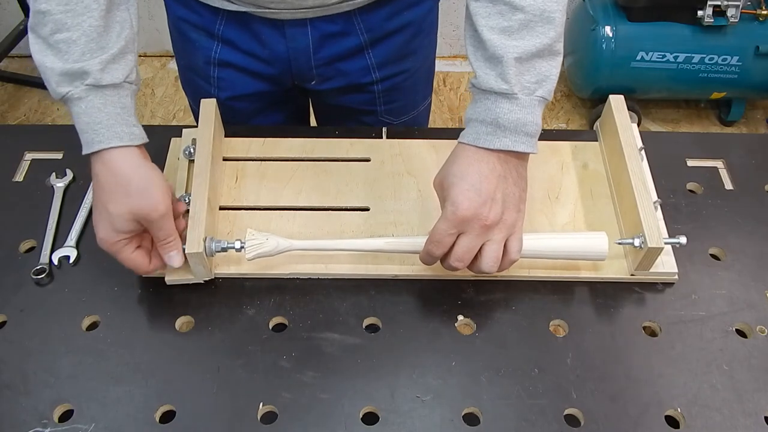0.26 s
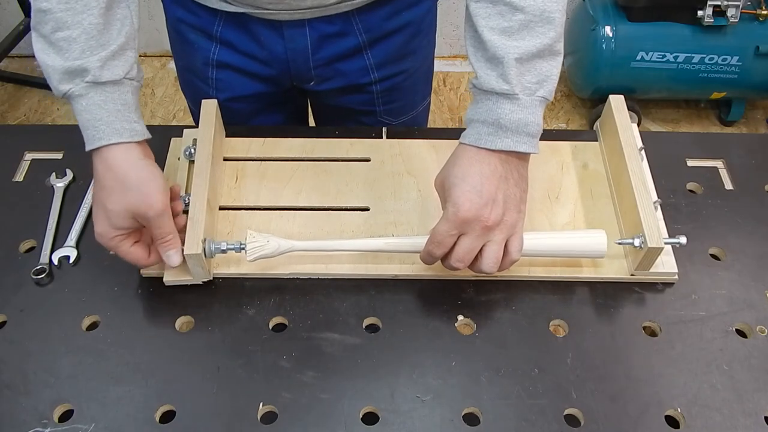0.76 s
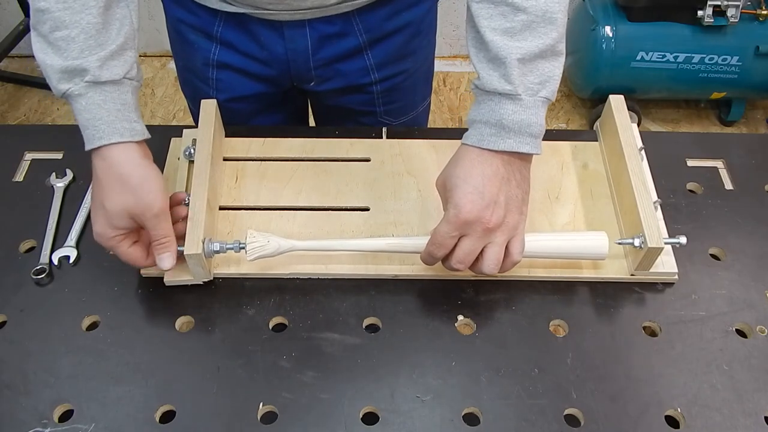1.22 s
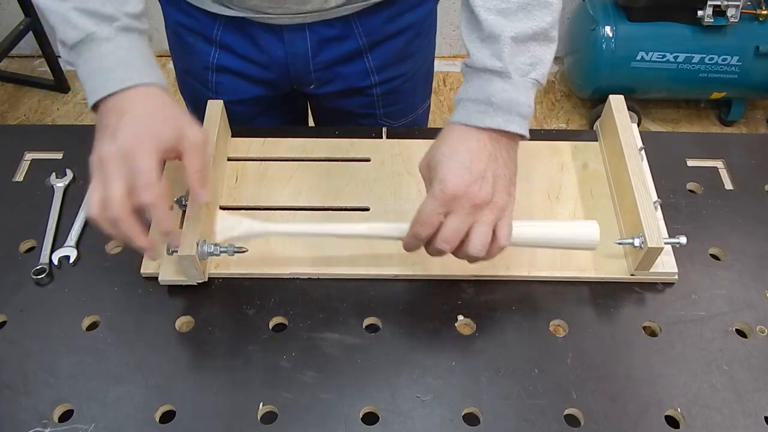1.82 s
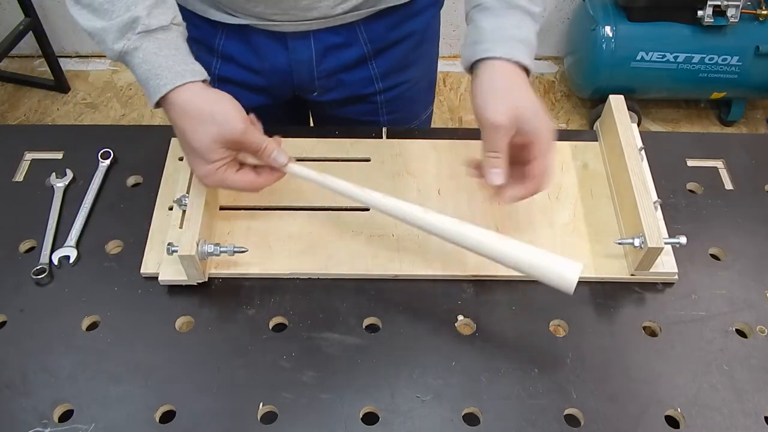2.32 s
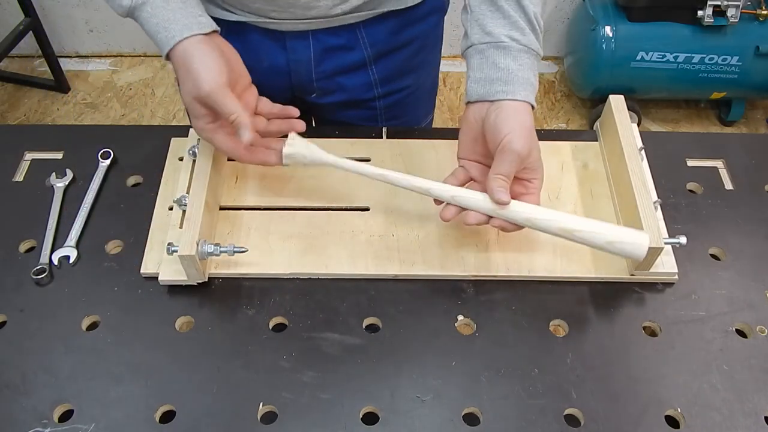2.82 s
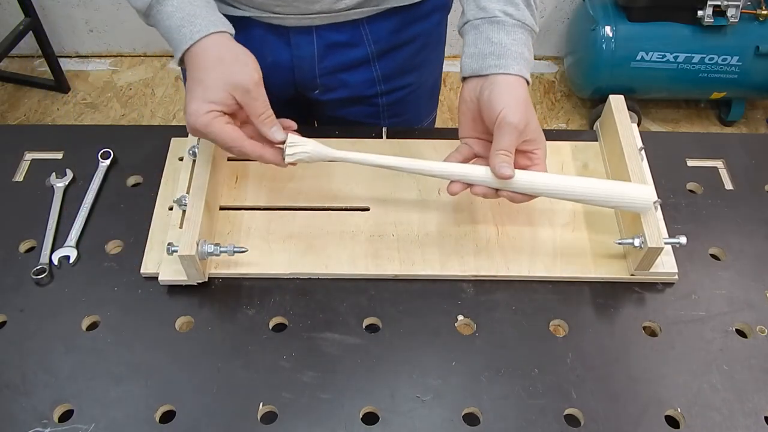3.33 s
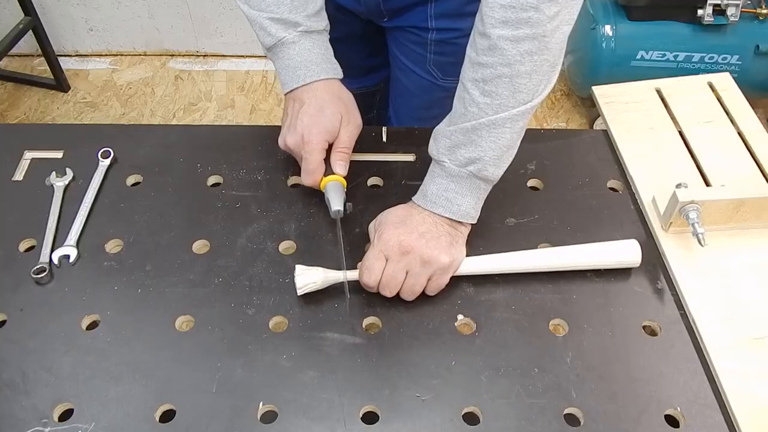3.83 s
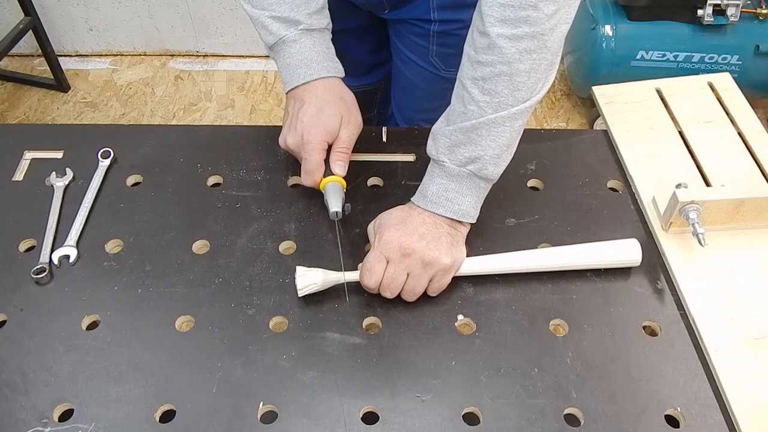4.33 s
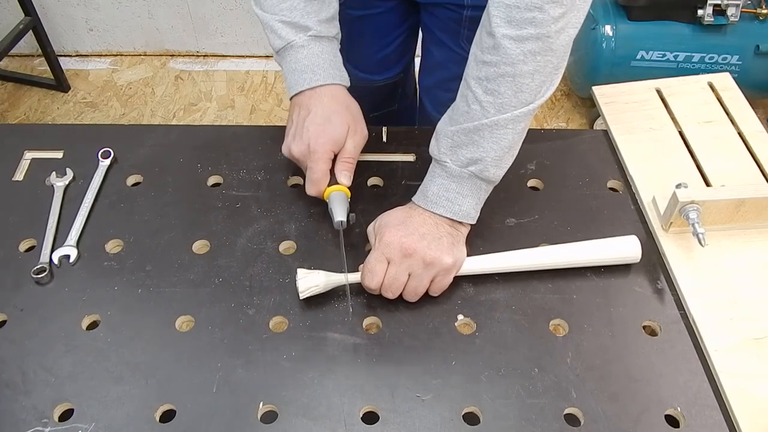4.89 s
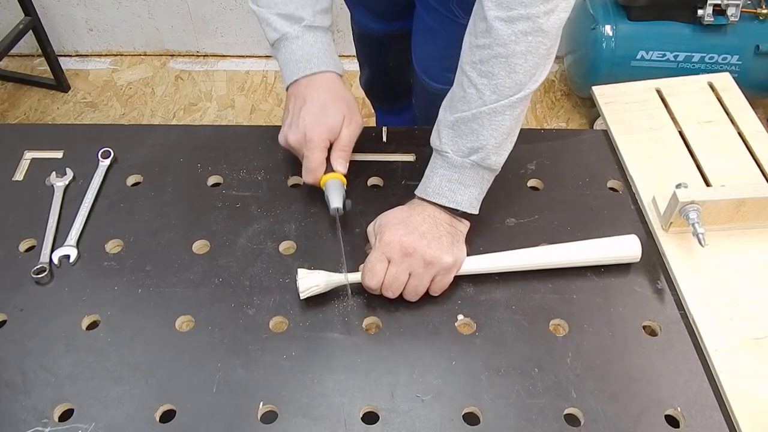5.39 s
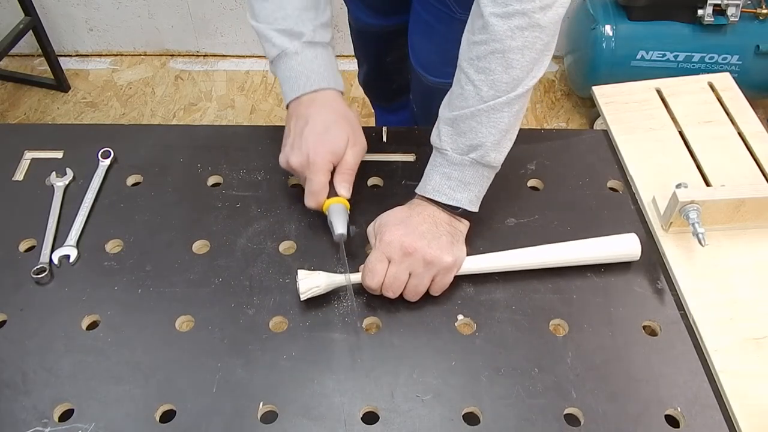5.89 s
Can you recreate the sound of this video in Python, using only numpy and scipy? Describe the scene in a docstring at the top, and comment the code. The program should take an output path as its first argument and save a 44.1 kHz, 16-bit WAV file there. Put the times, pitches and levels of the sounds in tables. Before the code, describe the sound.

Light metallic clicks and uneven scraping come from a screw being loosened in a wooden jig. After a knock, a lull holds only faint rubbing of skin on wood and a soft thud. A small hand saw then catches and rasps through a stick, its strokes growing stronger and more regular, with a hollow boom from the workbench and brief rings from the blade. It is heard from nearby in a quiet, slightly reverberant workshop.

```python
"""A fine hand saw cuts a turned stick on a hollow bench: its teeth catch and tear, rasping in the wood
and hissing in the blade, while the judder drives the bench's resonances to a boom. Before the cut,
fingers back a steel screw out of a plywood jig by stick-slip, with clicks and soft knocks, then lift
the stick and stroke it. Steel rings on faintly now and then. A quiet room rumble lies under everything."""
import sys
import numpy as np
from scipy import signal
from scipy.fft import rfft, irfft, next_fast_len
from scipy.io import wavfile

SR = 44100
rng = np.random.default_rng(int(sys.argv[2]) if len(sys.argv) > 2 else 0)


def file_out(sig):
    """Save sig as 16-bit WAV at sys.argv[1]."""
    # one column per channel
    cols = np.atleast_2d(sig).T
    # limit, then scale
    lim = np.clip(cols, -1, 1)
    pcm = np.round(lim * 32767).astype(np.int16)
    wavfile.write(sys.argv[1], SR, pcm)


N = 271215
FFT_SIZE = next_fast_len(N + SR // 2)
HZ = np.arange(FFT_SIZE // 2 + 1) * SR / FFT_SIZE

# Saw strokes. Each row: start, crest and stop in seconds, starting level relative to the crest in dB,
# then the levels in dB of bench shake, top panel, stick, tooth rasp and blade hiss.
SAW_STROKES = [(3.578, 3.667, 3.69, -7, -61, -67, -68, -75, -72),
               (3.703, 3.771, 3.785, -1.5, -41, -51, -45, -51, -52),
               (3.821, 3.828, 3.82, -10, -60, -57, -50.5, -75, -78),
               (3.961, 4.03, 4.05, -7.5, -32, -63, -45, -49, -52),
               (4.245, 4.33, 4.345, -16, -49.5, -57, -56, -60.5, -59),
               (4.364, 4.46, 4.55, -10.5, -32, -37.5, -41.5, -44.5, -51),
               (4.546, 4.654, 4.655, -2.5, -55, -47, -54, -41, -49.5),
               (4.656, 4.75, 4.756, -3.5, -26, -29.5, -32.5, -41.5, -44.5),
               (4.803, 4.838, 4.917, -5, -58, -48, -52.5, -54, -59),
               (5.007, 5.048, 5.11, -10, -28.5, -29.5, -41, -40, -44),
               (5.165, 5.251, 5.305, -14, -31, -32, -33.5, -40.5, -45.5),
               (5.361, 5.463, 5.49, -11.5, -31.5, -30.5, -36.5, -40.5, -47),
               (5.531, 5.62, 5.65, -15.5, -28, -29, -29, -37.5, -43.5),
               (5.693, 5.747, 5.815, -8.5, -31.5, -30, -36, -43.5, -53),
               (5.86, 5.925, 5.975, -14, -31, -27, -29.5, -37, -42.5),
               (6.03, 6.12, 6.17, -8.5, -29, -29.5, -35.5, -41, -49)]
# Resonances of the screw thread and of rubbed skin. Each row: frequency and bandwidth in Hz, level in dB.
THREAD_MODES = [(910, 180, -3), (1367, 130, 7.5), (1660, 220, 1), (2160, 300, -1.5), (2406, 31, 2),
                (2500, 230, -11.5), (2844, 130, -2), (3530, 420, -8), (4770, 890, -13.5),
                (5750, 1040, -16.5)]
SKIN_MODES = [(2140, 500, -5.5), (4000, 2700, -9), (8800, 2000, -4), (10440, 1560, -2.5), (11550, 870, -2),
              (12900, 1300, -6), (14800, 1800, -11)]


def saw():
    """Forced vibration: coarse catches of the teeth shake bench and stick, fine ones rasp and hiss."""
    # Resonances of each part. Each row: frequency and bandwidth in Hz, level in dB.
    bench_modes = [(133.6, 25, -3.5), (157, 38.6, 0), (172, 25.1, 2)]
    panel_modes = [(226, 17, 6), (296.4, 54, -5.5), (297.6, 18.6, -6.5), (343, 29, -13), (356.5, 23, -7),
                   (448, 27, -13.5)]
    frame_modes = [(37, 14, -7.5), (51, 46, -8), (104.9, 4.3, 8.5)]
    stick_modes = [(503, 29, -0.5), (594, 47, -1), (690, 54, -1), (719, 42, 6), (753, 61.3, 6.5),
                   (777.6, 58, 2.5), (837, 38, -3.5), (1053, 210, -13), (1208, 128, -9), (1310, 25, -1),
                   (1495, 48, -5)]
    tooth_modes = [(1250, 610, -6), (1706, 113, 1), (1950, 207, -0.5), (2366, 74, 0), (2610, 175, -3),
                   (3140, 1010, -6), (3850, 450, -3.5), (4600, 890, -9), (5620, 2200, -14.5),
                   (8400, 3100, -32.5)]
    hiss_modes = [(6500, 1950, -2.5), (8500, 1200, 0.5), (10820, 2470, 2), (11950, 530, 7.5),
                  (13050, 1200, -1.5), (15200, 1800, -4.5)]
    # Contours of a stroke, one row for each of its five layers, with columns as in envelopes().
    contours = [(.3, -4.5, -300, 0.85, 0.018, .015, 0.0071), (.4, -2, -300, 0.6, 0.0085, -.006, 0.028),
                (.9, -2.5, -200, 1.6, 0.01, .012, 0.016), (.9, -2, -200, 1.8, 0.0051, .004, 0.028),
                (.9, -3.5, -270, 1.8, 0.0029, 0.0033, 0.033)]
    # Weight leaned on the bench brings in its frame. Each row: time in seconds, dB over the shake.
    leaning = [(3.6, -21), (4.1, -5.5), (4.4, -2.5), (4.7, -7.5), (5.1, -10), (5.4, -7), (5.65, 1.5),
               (5.9, -4.5), (6.15, -5)]
    # Snags that jolt the bench, and bites of the first tooth. Each row: time in seconds, peak in dB.
    snags = [(3.756, -25.5), (3.963, -33), (4.446, -21), (4.476, -22), (4.701, -33), (5.393, -18),
             (5.462, -22), (5.741, -20.5)]
    bites = [(3.702, -45), (3.957, -53), (4.364, -43), (4.657, -29), (5.017, -54)]
    shake, top, stick, rasp, hiss = envelopes(SAW_STROKES, contours)
    bench, panel, shaft, teeth = map(body, (bench_modes, panel_modes, stick_modes, tooth_modes))
    weight = amp(np.interp(np.arange(N) / SR, *np.transpose(leaning), left=-200, right=-200))
    catches = slips(per_s=500, spread_db=3)
    fine_catches = hiss * slips(per_s=12000, spread_db=-1.5)
    boom = (filtered(shake * catches, bench) + filtered(top * catches, panel)
            + filtered(weight * shake * catches, body(frame_modes)))
    return (standing_damping() * boom
            + filtered(stick * slips(per_s=900, spread_db=2), shaft)
            + filtered(rasp * slips(per_s=4000, spread_db=1), teeth)
            + filtered(shifting_whistle(fine_catches), amp(-0.5) * body(hiss_modes))
            + strikes(*np.transpose(snags), panel + amp(-1.5) * bench)
            + strikes(*np.transpose(bites), shaft + teeth))


def shifting_whistle(hiss):
    """Narrow treble peaks, drawn at random every tenth of a second, give the hiss a faint whistle."""
    low_hz, high_hz, width_hz = 4000, 15500, 70
    out, hop = hiss.copy(), SR // 10
    r = np.exp(-np.pi * width_hz / SR)
    for i in range(round((SAW_STROKES[0][0] - .1) * SR), N, hop):
        piece = np.hanning(2 * hop)[:N - i] * hiss[:, i:i + 2 * hop]
        for hz in rng.uniform(low_hz, high_hz, size=11):
            poles = [1, -2 * r * np.cos(2 * np.pi * hz / SR), r * r]
            out[:, i:i + 2 * hop] += signal.lfilter([1 - r * r, 0, r * r - 1], poles, piece)
    return out


def standing_damping():
    """Contact damping: the gain of the ringing wood sinks while the blade stands between strokes."""
    damping_db_per_s, freed_early_s = -120, .012
    t, db = np.arange(N) / SR, 0
    for previous, following in zip(SAW_STROKES, SAW_STROKES[1:]):
        stop, freed = previous[2], following[0] - freed_early_s
        depth_db = damping_db_per_s * max(freed - stop, 0)
        db = db + np.interp(t, [stop, freed, freed + .002], [0, depth_db, 0])
    return amp(db)


def screw():
    """Stick-slip friction: the thread judders the jig and rasps in the steel, while skin hisses."""
    # Turns of the screw. Each row: start, crest and stop in seconds, starting level relative to
    # the crest in dB, then the levels in dB of shake, rasp and hiss.
    turns = [(-.02, .03, 0.052, -10, -40, -42.5, -53), (.2, .26, 0.62, -30, -53.5, -62, -69),
             (.294, .31, .44, 0, -40.5, -46, -58), (.55, .565, 0.61, -3, -48.5, -54, -66.5),
             (.785, .93, 1, -12.5, -40.5, -43, -60), (.996, 1.005, 1.03, -3, -37.5, -41, -68),
             (1.272, 1.285, 1.33, -6, -39.5, -45, -64), (1.33, 1.362, 1.438, -5, -38, -37.5, -55),
             (1.56, 1.58, 1.63, -9, -48.5, -52.5, -69)]
    # Contours of a turn, one row for each of its three layers, with columns as in envelopes().
    contours = [(.3, -2.5, -200, 1, 0.0073, 0.0086, 0.032), (.9, -8, -170, 1, .002, 0.0017, 0.023),
                (.9, -10.5, -110, 0.7, 0.0016, .002, 0.032)]
    # Resonances of the jig on the bench. Each row: frequency and bandwidth in Hz, level in dB.
    jig_modes = [(50.3, 77, -8.5), (95.4, 9.6, 4.5), (144.6, 25, 4), (164, 23.4, 7), (187.6, 49, -1),
                 (226.5, 43, -3.5), (276, 32, -7.5), (393, 27, -5.5), (467, 45, -13), (564, 20, -9),
                 (700, 46, -9), (865, 78, -15)]
    shake, rasp, hiss = envelopes(turns, contours)
    return (filtered(shake * slips(per_s=400, spread_db=2), body(jig_modes))
            + filtered(rasp * slips(per_s=1200, spread_db=-2), body(THREAD_MODES))
            + filtered(hiss * slips(per_s=6000, spread_db=1), body(SKIN_MODES)))


def screw_clicks():
    """Impulse excitation: each click sounds the thread's modes and rings briefly at its own pitch."""
    # Clicks of the screw in its seat. Each row: time in seconds, peak in dB, pitch in Hz.
    clicks = [(0.293, -39.5, 2450), (0.302, -58, 2350), (0.454, -39.5, 2070), (0.4732, -53, 2170),
              (0.5472, -37, 2050), (0.795, -40, 2040), (0.908, -28.5, 1330), (0.9333, -30, 1410),
              (0.99, -24.5, 2180), (1.2669, -36.5, 1940), (1.2735, -32.5, 2006), (1.351, -38, 2480),
              (1.366, -30, 2720), (1.567, -44.5, 1960)]
    times, peaks_db, _ = np.transpose(clicks)
    blunt_contact = 1 / (1 + 1j * HZ / 4000) ** 2
    out = strikes(times, peaks_db, body(THREAD_MODES) * blunt_contact)
    t, t60_s = np.arange(SR // 10) / SR, 0.028
    ring = amp(-3 - 60 * t / t60_s)
    for start, db, hz in clicks:
        i = round(start * SR)
        out[:, i:i + len(t)] += amp(db) * ring * np.sin(2 * np.pi * hz * t)
    return out


def jig_knocks():
    """Soft impact: a padded blow spreads its force over milliseconds, so it excites mainly low modes."""
    # Blows on the jig's end wall. Each row: time in seconds, peak in dB, contact cut-off in Hz.
    blows = [(.338, -38, 700), (.402, -35, 600), (1.448, -25, 1100), (1.4549, -25.5, 1100),
             (1.568, -38, 1200), (3.243, -28, 550), (3.2498, -21, 490)]
    # Resonances of that wall. Each row: frequency and bandwidth in Hz, level in dB.
    wall_modes = [(100.6, 11, -9), (138, 21, -0.5), (163, 14, 4), (190.6, 27, -7), (229.6, 19, 2),
                  (267, 22, 1), (358, 28, 0.5), (410, 23, -5), (464.5, 11, -2.5), (521, 30, -4)]
    wall = body(wall_modes)
    return sum(strikes([s], [db], wall / (1 + 1j * HZ / cut_hz) ** 4) for s, db, cut_hz in blows)


def singing_steel():
    """Free vibration: released thin steel keeps one fluttering partial until a contact damps it."""
    # Each row: start in seconds, frequency in Hz, level in dB, then T60 and duration in seconds.
    partials = [(1.404, 9308, -73, 2.3, 0.54), (1.45, 11500, -78, 2.0, .45), (1.50, 6471, -74, 1.2, .12),
                (3.772, 2342, -58, 1.3, 0.27), (4.065, 2342, -63, 1.1, 0.12),
                (5.253, 2325, -43, 1.54, 0.11), (5.738, 2064, -38, 0.93, 0.14)]
    flutter_db, flutter_per_s, attack_s = 3, 90, 0.009
    out = np.zeros((2, N))
    for start, hz, db, t60, duration in partials:
        t = np.arange(round(1.5 * duration * SR)) / SR
        flutter = np.interp(t, np.arange(200) / flutter_per_s, rng.standard_normal(200))
        ring = amp(db - 60 * t / t60 + flutter_db * flutter)
        gate = (1 - np.exp(-t / attack_s)) * np.exp(-(t / duration) ** 8)
        i = round(start * SR)
        out[:, i:i + len(t)] += ring * gate * np.sin(2 * np.pi * hz * t)
    return out


def fingers():
    """Sliding friction: dry skin on the smooth stick makes a bright hiss of tiny slips."""
    # Each row: start, crest and stop in seconds, starting level relative to the crest in dB, level in dB.
    slides = [(1.45, 1.65, 1.9, -15, -71.5), (2.0, 2.095, 2.115, -25, -56.5), (2.2, 2.33, 2.4, -13, -67),
              (2.47, 2.505, 2.56, -4, -59.5), (2.8, 2.845, 2.8, -20, -56), (3.06, 3.13, 3.15, -19, -67),
              (3.24, 3.28, 3.25, -20, -62)]
    contour = (.9, -5.5, -250, 0.77, 0.009, 0.0019, 0.026)   # columns as in envelopes()
    holding_db = -73   # steady hiss of hands at rest
    hiss = envelopes(slides, [contour])[0] + amp(holding_db)
    return filtered(hiss * slips(per_s=7000, spread_db=1.5), body(SKIN_MODES))


def reverberation(x):
    """Repeated reflection: ten feedback delays a channel, dulled by wall absorption on every round."""
    t60_s, wall_cutoff_hz = 0.44, 5600
    response = np.zeros((2, len(HZ)), complex)
    absorption = 1 / (1 + 1j * HZ / wall_cutoff_hz)
    for k, delay_s in enumerate(rng.uniform(.015, .045, 20)):
        loop = amp(-60 * delay_s / t60_s) * absorption * np.exp(-2j * np.pi * HZ * delay_s)
        response[k % 2] += (-1) ** (k // 2) * loop / (1 - loop)
    return filtered(x, response)


def room_tone():
    """Diffuse field: distant machinery and air give steady coloured noise, as mid and side."""
    # Each row: frequency in Hz, relative spectral density in dB.
    spectrum = [(12, -40), (20, 2.5), (58, -3.5), (76, 2.5), (153, -4.5), (214, -5.5), (253, -6),
                (275, -12.5), (344, -8), (523, -12.5), (569, -14.5), (1240, -15), (2640, -25.5),
                (3030, -26), (15700, -45)]
    # Stereo width. Each row: frequency in Hz, side relative to mid in dB.
    width = [(60, -9.5), (240, -5), (950, -3), (3770, 0), (15000, 0.5)]
    noise = filtered(rng.standard_normal((2, N)), amp(curve_db(spectrum)))
    mid, side = amp(-53.5) * noise / noise.std()
    return np.array([mid, filtered(side, amp(curve_db(width)))])


def envelopes(movements, contours):
    """Amplitude envelopes, one a layer: each hand movement swells, sags and dies; their powers add."""
    # Each contour row: share of the swell, sag in dB, decay in dB per second, exponent of swell and sag,
    # then advance of the crest, advance of the stop and attack time in seconds.
    t, out = np.arange(0, N + 32, 32) / SR, []
    for k, (share, sag_db, decay, power_law, crest_lead, stop_lead, attack) in enumerate(contours):
        power = 0
        for start, crest, stop, start_db, *levels_db in movements:
            crest, stop = max(crest - crest_lead, start + .001), stop - stop_lead
            swell = np.interp(t, [start, crest], [1, 0]) ** power_law
            sag = np.interp(t, [crest, stop], [0, 1]) ** power_law
            edges_db = np.interp(t, [start - attack, start, stop, stop + 1], [-40, 0, 0, decay], left=-200)
            power = power + amp(levels_db[k] + share * start_db * swell + sag_db * sag + edges_db) ** 2
        out.append(np.interp(np.arange(N) / SR, t, np.sqrt(power)))
    return out


def slips(per_s, spread_db):
    """Shot noise: independent mid and side trains of impulses of uneven size, at rms 1."""
    sizes = amp(spread_db * np.minimum(rng.exponential(1, (2, N)), 4))
    signs = rng.choice([-1, 1], (2, N))
    train = sizes * signs * (rng.random((2, N)) < per_s / SR)
    return train / train.std()


def strikes(times, peaks_db, response):
    """Impulse responses of a body, scaled to peak levels; the side channel takes random signs."""
    impulses = np.zeros((2, N))
    signs = [np.ones(len(peaks_db)), rng.choice([-1, 1], len(peaks_db))]
    impulses[:, np.round(np.asarray(times) * SR).astype(int)] = amp(peaks_db) * signs
    return filtered(impulses, response / np.abs(irfft(response, FFT_SIZE)).max())


def body(modes):
    """Modal superposition: resonances summed with alternating signs, at unit power gain for noise."""
    z, response = np.exp(-2j * np.pi * HZ / SR), 0
    for k, (hz, width_hz, db) in enumerate(modes):
        r = np.exp(-np.pi * width_hz / SR)
        poles = 1 - 2 * r * np.cos(2 * np.pi * hz / SR) * z + r * r * z * z
        response = response + (-1) ** k * amp(db) * (1 - r * r) * (1 - z * z) / poles
    return response / np.sqrt(np.mean(np.abs(response) ** 2))


def filtered(x, response):
    """Convolution as a product of spectra."""
    return irfft(rfft(x, FFT_SIZE) * response, FFT_SIZE)[..., :N]


def curve_db(points):
    """Levels interpolated over logarithmic frequency."""
    hz, db = np.transpose(points)
    return np.interp(np.log(HZ + 1), np.log(hz), db)


def amp(db):
    """Amplitude ratio of a level in dB."""
    return 10 ** (np.asarray(db) / 20)


def scene():
    """Superposition: the sources add as mid and side, wider in the treble, and become left and right."""
    # Stereo width. Each row: frequency in Hz, side relative to mid in dB.
    width = [(60, -22), (150, -23), (380, -16.5), (950, -11.5), (2380, -3.5), (5980, 0), (15000, -0.5)]
    # Stereo balance. Each row: frequency in Hz, left relative to right in dB.
    balance = [(60, -1.0), (240, -1.0), (950, -1.0), (3770, -1.5), (15000, 0)]
    work = screw() + fingers() + saw() + screw_clicks() + jig_knocks() + singing_steel()
    mid, side = work + amp(-16.5) * reverberation(work[0])
    mid, side = np.array([mid, filtered(side, amp(curve_db(width)))]) + room_tone()
    left_gain = amp(curve_db(balance) / 2)
    return np.array([filtered(mid + side, left_gain), filtered(mid - side, 1 / left_gain)])


def record(dry):
    """Band limiting: a steep elliptic low-pass removes the highest treble."""
    cutoff_hz = 15850
    return signal.sosfilt(signal.ellip(14, .3, 80, cutoff_hz, fs=SR, output="sos"), dry)


dry = scene()
out = record(dry)
file_out(out)
```